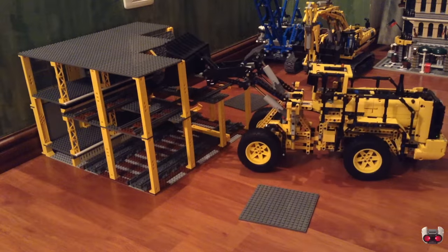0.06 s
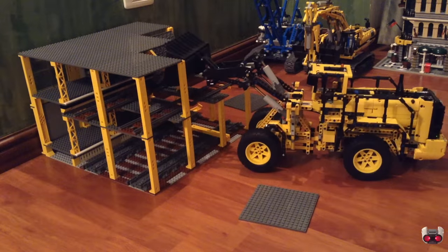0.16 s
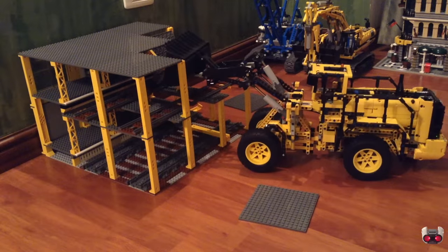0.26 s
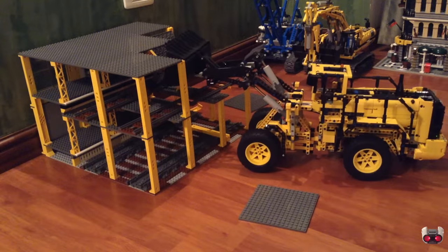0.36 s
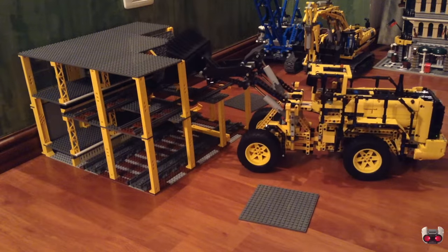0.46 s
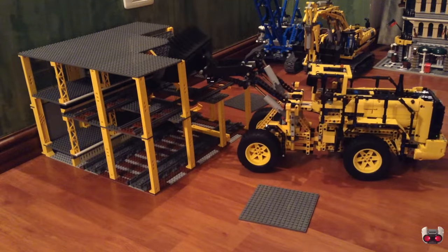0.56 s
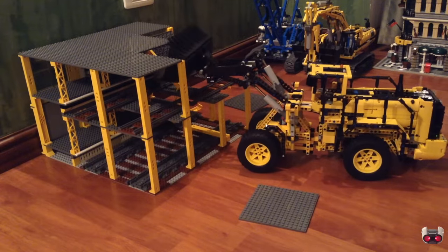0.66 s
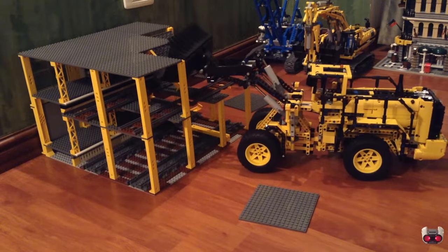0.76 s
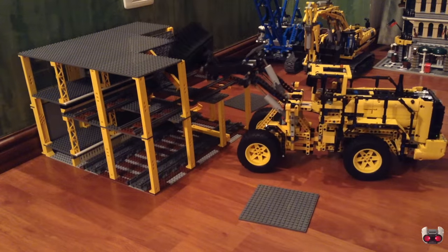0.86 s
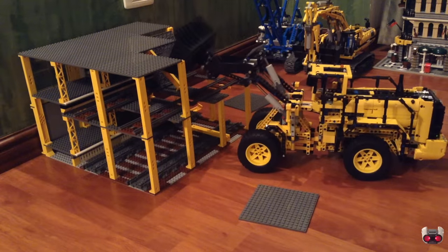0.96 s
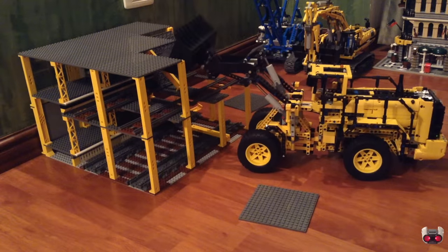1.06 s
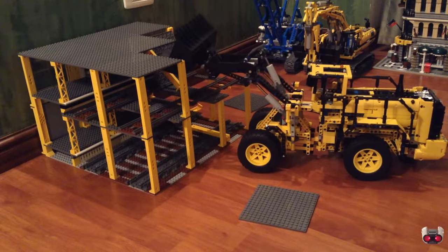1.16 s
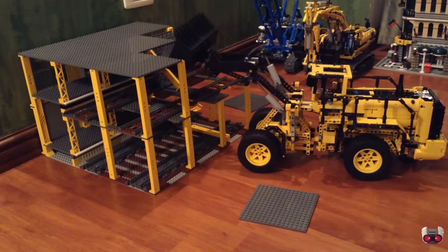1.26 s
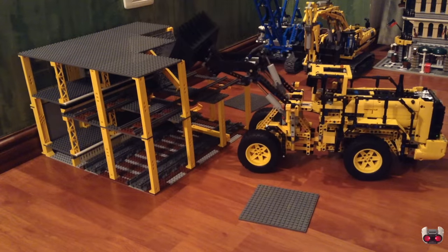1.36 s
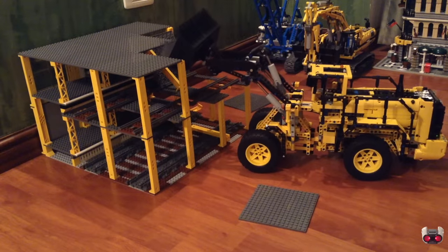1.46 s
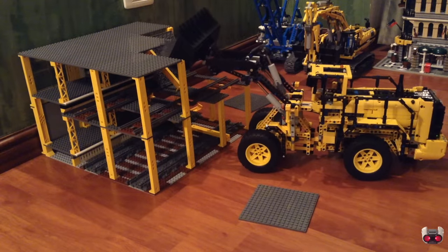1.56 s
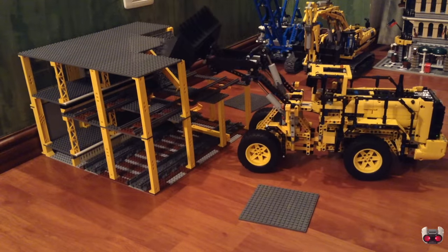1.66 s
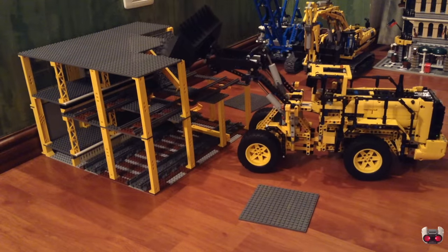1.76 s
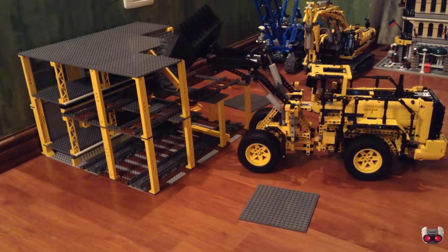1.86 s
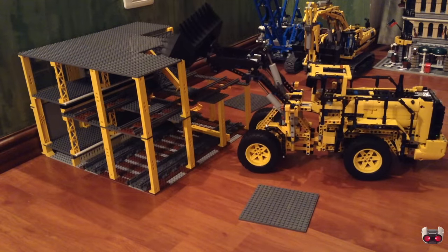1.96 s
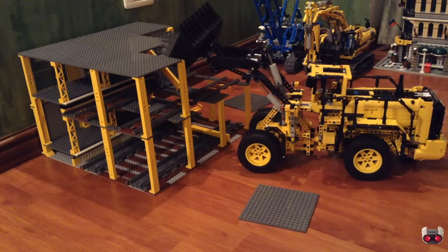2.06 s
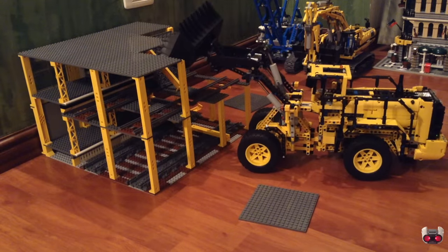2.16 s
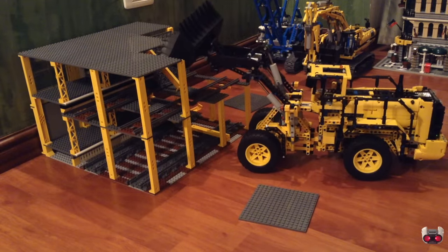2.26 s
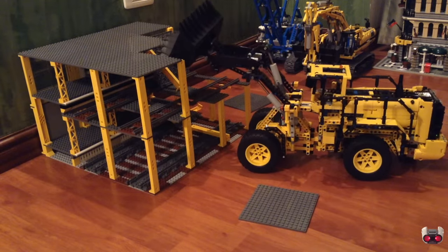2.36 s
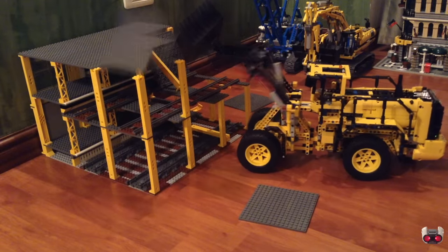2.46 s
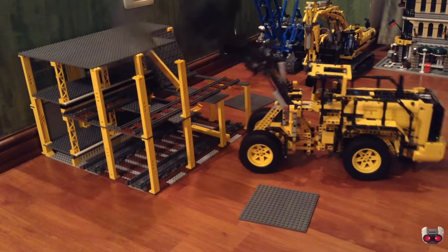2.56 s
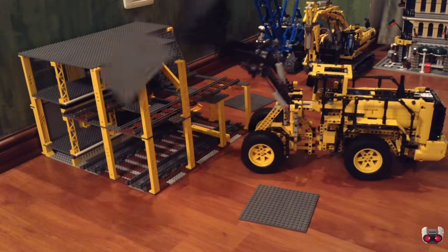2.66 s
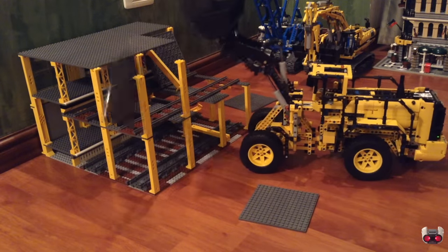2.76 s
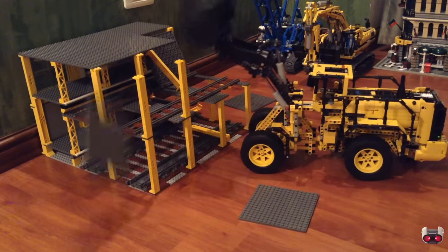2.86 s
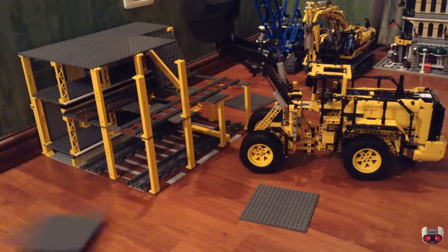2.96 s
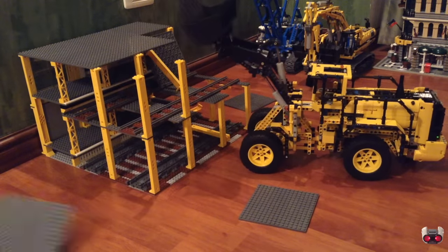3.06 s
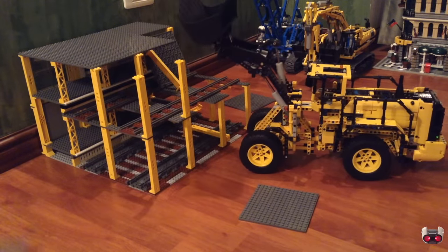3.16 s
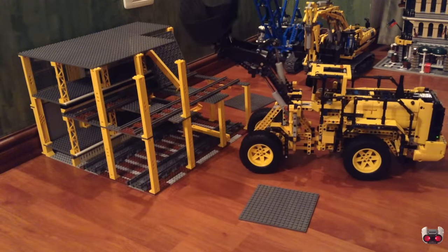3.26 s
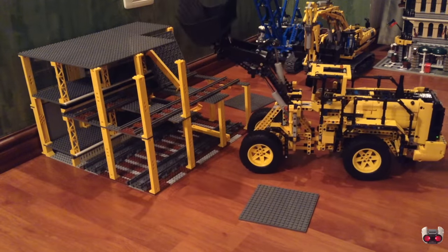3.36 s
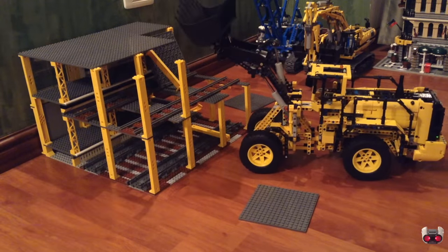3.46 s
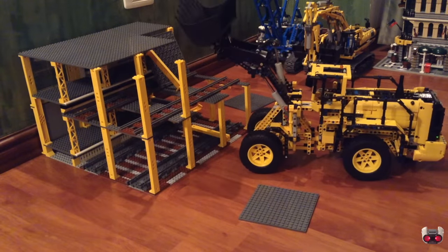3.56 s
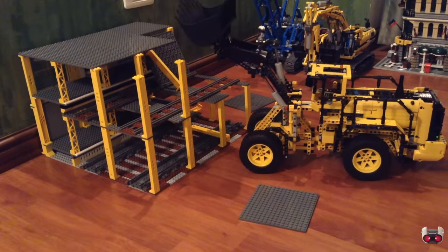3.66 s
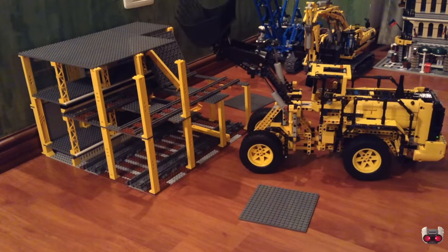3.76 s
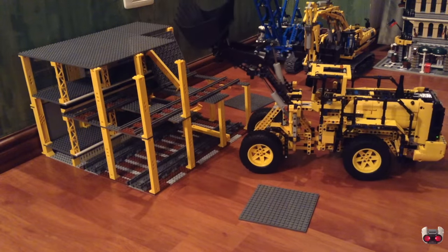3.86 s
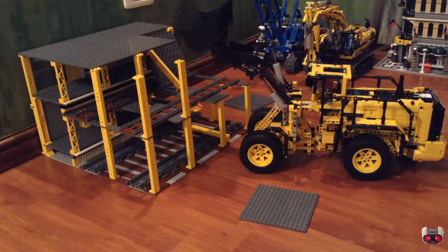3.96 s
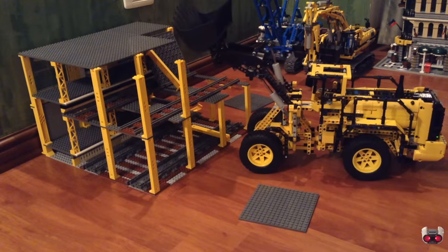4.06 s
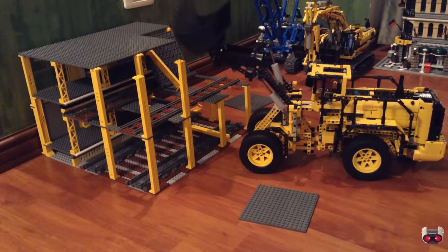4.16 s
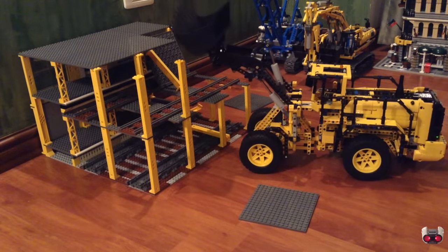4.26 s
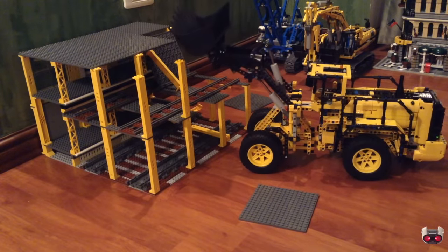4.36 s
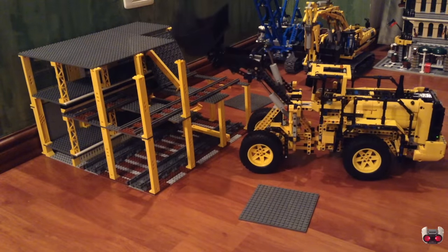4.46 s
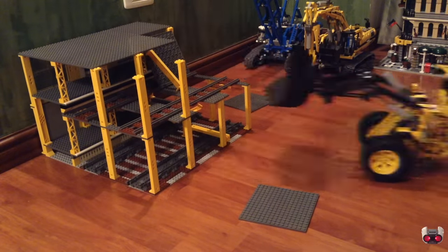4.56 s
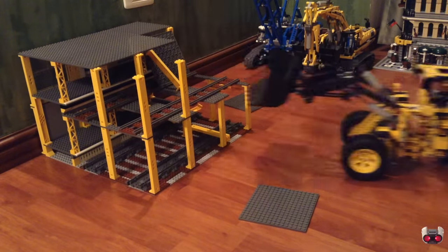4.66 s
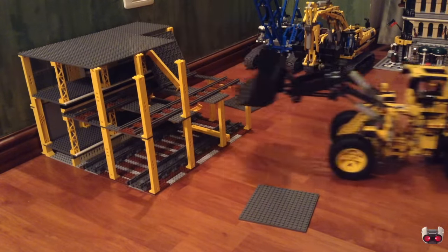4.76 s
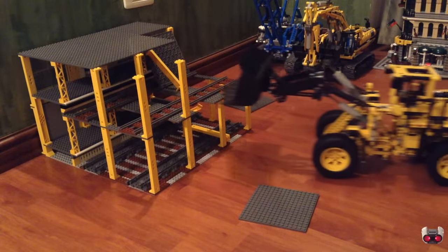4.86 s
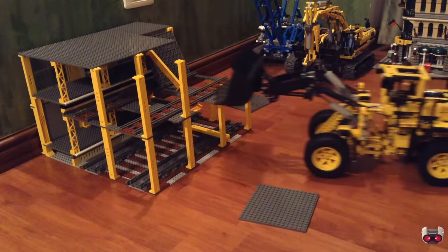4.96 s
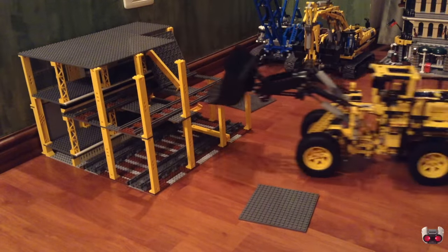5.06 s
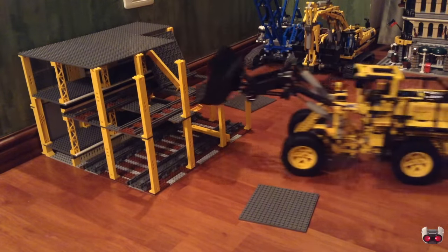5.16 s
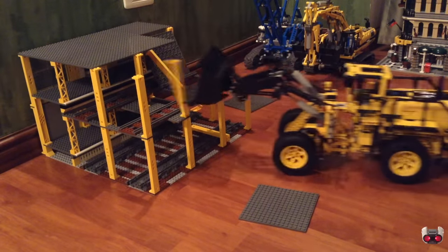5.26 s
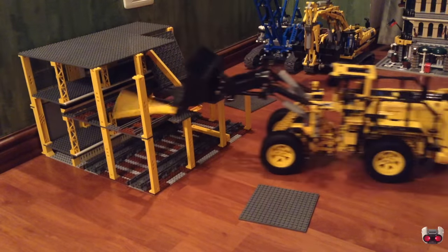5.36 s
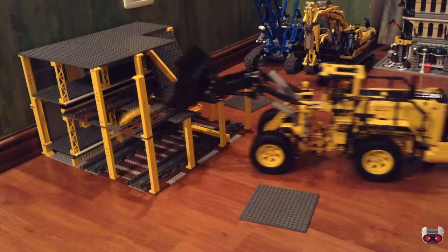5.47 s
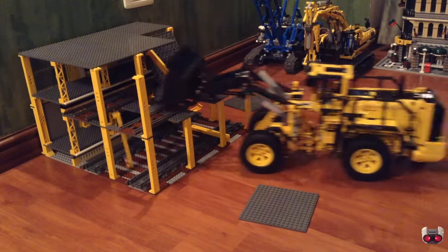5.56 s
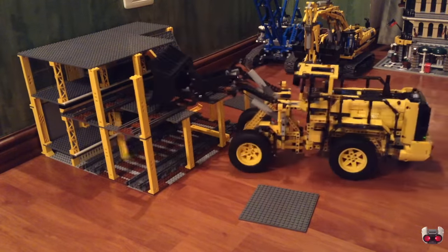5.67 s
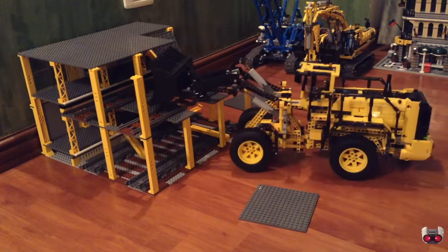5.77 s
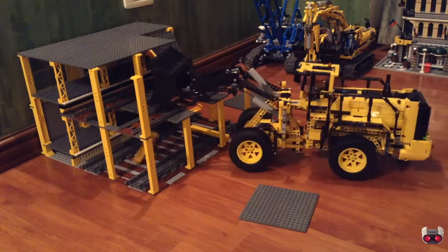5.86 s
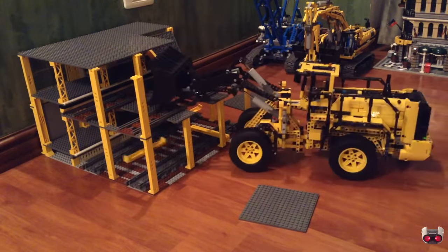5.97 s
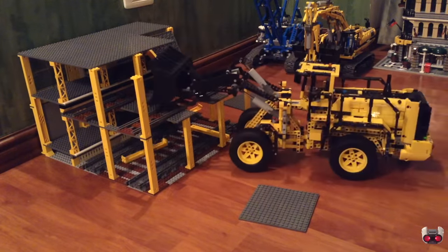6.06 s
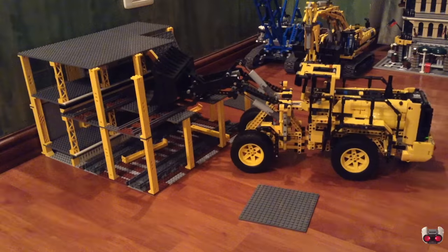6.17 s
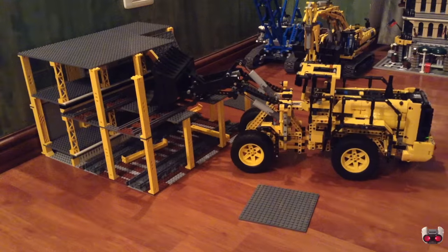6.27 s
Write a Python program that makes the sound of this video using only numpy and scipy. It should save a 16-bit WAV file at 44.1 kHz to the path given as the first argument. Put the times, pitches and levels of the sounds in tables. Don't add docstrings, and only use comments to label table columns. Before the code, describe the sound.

A toy loader's geared motor whirs with small clicks, flings a clattering plate, whirs again, and squeaks forward to crash into loose plastic.

```python
import sys
import numpy as np
from scipy import signal
from scipy.fft import rfft, irfft, next_fast_len
from scipy.io import wavfile
from scipy.ndimage import uniform_filter1d

SR = 44100
rng = np.random.default_rng(int(sys.argv[2]) if len(sys.argv) > 2 else 0)


def volts_from_db(level):
    exponent = np.asarray(level, float) / 20
    return 10 ** exponent


def bounce(signal):
    frames = np.transpose(np.atleast_2d(signal))
    limited = np.clip(frames, -1, 1)
    pcm = np.round(limited * 32767).astype(np.int16)
    wavfile.write(sys.argv[1], SR, pcm)


N = 279153
TIME = np.arange(N) / SR

# t/s, tooth rate f/Hz, level/dB
ARM_LIFTING = [(.133, 1230, -58.5), (.185, 1295, -46), (.24, 1366, -41.5), (.32, 1436, -40.5),
               (1.05, 1454, -39.5), (1.55, 1357, -39), (1.8, 1294, -39.5), (2.02, 1207, -39),
               (2.25, 1118, -40), (2.47, 1030, -39.5)]
# t/s, tooth rate f/Hz, level/dB
ARM_FREED = [
    (2.47, 1330, -36.5),
    (2.772, 1310, -38.5),
    (2.9, 1370, -38),
]
# multiple of tooth rate, level/dB
ARM_ORDERS = [(1, -6), (2, 1), (3, 2), (4, 1), (5, -1), (6, -3), (7, -5)]
# f/Hz, level/dB per Hz
ARM_HISS = [(210, -41.5), (400, -21.5), (822, -14), (904, -16), (1090, -11.5), (1280, -9), (1410, -9.5),
            (1570, -10.5), (2300, -7), (2520, -2), (3100, -5), (5650, 0.5), (10600, -1.5), (13300, -1.5),
            (15300, -1)]


def arm_motor():
    return motor([ARM_LIFTING, ARM_FREED], ARM_ORDERS, ARM_HISS, wobble=0.0065,
                 grit_db=1.14, whine_db=-19.0, hum_db=-21.5, hum_width_hz=26)


# t/s, tooth rate f/Hz, level/dB
BUCKET_TIPPING = [(3.74, 1180, -77), (3.78, 1240, -53.5), (3.84, 1269, -47.5), (4.24, 1283, -47.5),
                  (4.37, 1218, -57.5), (4.41, 1260, -45), (4.62, 1240, -47)]
# multiple of tooth rate, level/dB
BUCKET_ORDERS = [(.47, -8), (2, -8), (4, -4), (5, 1)]
# f/Hz, level/dB per Hz
BUCKET_HISS = [(210, -68), (350, -27), (590, -16), (648, -26.5), (1010, -17), (1300, -20), (1430, -12),
               (1600, -19), (2690, -9), (2910, -9), (3300, -10), (5060, -7.5), (15300, -7)]


def bucket_motor():
    return motor([BUCKET_TIPPING], BUCKET_ORDERS, BUCKET_HISS, wobble=0.01,
                 grit_db=-3.0, whine_db=-20, hum_db=-34.5, hum_width_hz=80)


# t/s, tooth rate f/Hz, level/dB
WHEELS_DRIVING = [(4.6, 1332, -64), (4.62, 1310, -37.5), (5.0, 1340, -37), (5.13, 1287, -35),
                  (5.27, 1225, -36), (5.45, 1200, -34.5), (5.8, 1180, -38.5), (5.83, 1157, -70)]
# multiple of tooth rate, level/dB
WHEEL_ORDERS = [(1, -5), (2, -4), (3, -5), (4, -2), (5, -6), (7, 0)]
# f/Hz, level/dB per Hz
WHEEL_HISS = [(160, -31.5), (280, -16), (447, -9), (556, -10), (636, -6), (889, -18), (1370, -16.5),
              (2020, -18), (2500, -9.5), (2970, -18), (4010, -14.5), (4430, -17), (8500, -6), (9400, -2),
              (10600, -6), (13200, -4), (15300, -16)]


def wheel_motor():
    return motor([WHEELS_DRIVING], WHEEL_ORDERS, WHEEL_HISS, wobble=0.008,
                 grit_db=1.44, whine_db=-20.5, hum_db=-27.5, hum_width_hz=110)


# f/Hz, level/dB
HOUSING = [(1000, -4), (2200, 0), (2550, 5), (2850, -1), (3300, -2), (3700, 3), (3850, -1), (4000, 5),
           (4090, 4), (4170, 2), (4300, 1), (4900, 2), (5200, 7), (5400, 5), (5600, 7), (5800, 6),
           (6150, 0), (6550, 7), (6800, 4), (7200, 2), (7700, 1), (9000, 5)]
# t/s, share of speed lost, build-up/s, release/s
JAMS = [
    (.27, 0.04, .27, .03),
    (.54, .045, .34, .04),
]
HUM_HZ = (410, 361)


def motor(curves, orders, hiss, wobble, grit_db, whine_db, hum_db, hum_width_hz):
    gate, tooth_hz, effort_db = motor_curves(curves)
    loaded = TIME < curves[0][-1][0]
    speed = 1 - shower(JAMS) + wobble * walk(60)
    phase = 2 * np.pi * np.cumsum(tooth_hz * speed) / SR

    whine = np.zeros(N)
    for order, order_db in orders:
        housing_db = np.interp(order * tooth_hz, *np.transpose(HOUSING))
        patchy_db = 2.8 * (0.62 * walk(14) + 0.76 * walk(45))
        whine += volts_from_db(order_db + housing_db + patchy_db) * np.sin(order * phase)

    shaft = np.sin(phase / 2.86) * volts_from_db(walk(7))
    hum = sum(band(band(shaft, hz, hum_width_hz), hz, hum_width_hz) for hz in HUM_HZ)

    grit = volts_from_db(grit_db * rng.exponential(size=N) + 0.86 * walk(120))
    brushes = rng.standard_normal(N) * grit * (1 + 0.077 * np.cos(phase / 6))
    geared = volts_from_db(whine_db) * whine + volts_from_db(hum_db) * hum
    return gate * volts_from_db(effort_db) * (unit(colour(brushes, hiss)) + loaded * geared)


def motor_curves(curves):
    gate = np.zeros(N)
    for curve in curves:
        gate += np.clip(np.minimum(TIME - curve[0][0], curve[-1][0] - TIME) / 0.0046, 0, 1)
    for curve in curves[1:]:
        gate += np.abs(TIME - curve[0][0]) < .006
    s, tooth_hz, effort_db = np.transpose(np.concatenate(curves))
    return np.minimum(gate, 1), np.interp(TIME, s, tooth_hz), np.interp(TIME, s, effort_db)


# t/s, level/dB, f/Hz, a third of the fade time/s
SQUEAKS = [(4.612, -49, 4640, 0.017), (4.61, -47, 2800, 0.0064), (4.64, -43, 2770, 0.016),
           (4.825, -40.5, 2780, 0.015), (4.985, -40.5, 2810, 0.013), (5.15, -40.5, 2770, 0.012),
           (5.17, -50, 2490, 0.03), (5.326, -45, 2770, 0.0084)]


def squeaks():
    out = np.zeros(N)
    t = np.arange(SR // 4) / SR
    for s, db, hz, rise in SQUEAKS:
        phase = 2 * np.pi * hz * t * (1 - .33 * t)
        pair = np.sin(phase) + 0.35 * np.sin(.955 * phase)
        swell = np.minimum(t / 0.0046, 1) * np.exp(-(t / (3 * rise)) ** 2)
        start = int(s * SR)
        out[start:start + len(t)] += volts_from_db(db) * swell * pair
    return out * volts_from_db(4.5 * walk(140))


# t/s, crack peak level/dB, thud level/dB re crack, crack f/Hz, crack length/s
SNAGS = [(0.0, -35, -14.5, 1600, 0.023), (0.001, -40.5, -27, 4800, 0.045), (0.524, -42, 0, 2000, 0.015),
         (0.538, -37, -20, 3300, .008), (0.546, -33, -12, 2400, 0.012), (.56, -37, -12, 1400, .015),
         (0.878, -41, 2, 3000, 0.01), (.886, -37, -20, 3500, .015), (0.9, -36, -20, 1900, 0.012),
         (1.285, -39, -11, 5560, .0094), (1.299, -30, -14, 3000, 0.012), (1.308, -31, -14, 1500, .015),
         (1.358, -37, -6, 5560, 0.018), (1.478, -37.5, -2.5, 3000, 0.013), (1.64, -33, -13, 3500, 0.023),
         (2.474, -28.5, -9, 2350, 0.029), (2.483, -30.5, -4.5, 3000, .01), (2.49, -24.5, -5, 2600, 0.019),
         (2.494, -23, -30, 10500, .004), (2.507, -25.5, -12, 9000, 0.007), (2.514, -27, -15, 7000, .005),
         (2.572, -27, -16, 7000, 0.008), (2.62, -32, -20, 7000, .006), (4.614, -38, -35, 2760, 0.024),
         (5.266, -30, -6.5, 2620, 0.046)]
# f/Hz, level/dB, t60/s
ARM_MODES = [(272, -9, 0.26), (358, -6.5, 0.24), (409, 3.5, 0.069), (488, -2, 0.05), (580, 14, 0.02),
             (643, 5, 0.03), (784, 0.5, 0.049), (1016, 5, 0.11), (1110, -10, 0.043), (1682, -2.5, 0.11)]


def arm_snags():
    return blows(SNAGS, ARM_MODES, ring_db=-7.5, ring_s=0.012, ring_top_hz=2270, scrape=1.55,
                 snap=0, wide_db=-25, rise_s=0.0017, spread=1.0)


# t/s, crack peak level/dB, thud level/dB re crack, crack f/Hz, crack length/s
FALL = [(2.724, -8, -14, 3100, 0.008), (2.761, -17, -11, 2340, 0.022), (2.791, -20, -30, 13500, .004),
        (2.803, -13, -20, 9000, 0.008), (2.832, -10, -24.5, 8900, 0.006), (2.845, -21, -27, 11000, .012),
        (2.876, -15, -28, 8100, 0.0043), (2.901, -13, -26, 10500, 0.015), (2.92, -17.5, -18, 3000, 0.018),
        (2.935, -13.5, -18, 9830, 0.005), (2.941, -12, -27, 9500, 0.0078), (2.972, -18, -38, 9700, .004),
        (2.978, -11, -43, 9000, 0.005), (2.987, -15, -28, 3940, 0.011), (3.013, -10.5, -38, 9200, 0.0095),
        (3.02, -12, -44, 10500, 0.011), (3.034, -11, -49, 9900, 0.0058), (3.038, -12, -43, 6530, 0.009),
        (3.117, -23.5, -17.5, 8800, 0.006), (3.123, -24, -25, 9600, 0.011), (3.2, -24.5, -21, 8300, 0.0081),
        (3.231, -32, -11, 8520, 0.012), (3.272, -20, -21, 8900, 0.024), (3.28, -16.5, -32, 2400, 0.0075),
        (3.318, -25.5, -12.5, 9900, 0.0062), (3.35, -20.5, -22.5, 8100, 0.005),
        (3.428, -30, -30, 7000, 0.006), (3.433, -28, -26, 9500, .005), (3.449, -26, -13, 1500, 0.005),
        (3.45, -23, -43, 7400, 0.011), (3.457, -26, -30, 6500, .004)]
# f/Hz, level/dB, t60/s
PLATE_MODES = [(251, -10, 0.092), (315, -41, 0.055), (408.3, -2, 0.28), (452, -1, 0.13), (527, -4, 0.13),
               (576, -1, 0.044), (642, -14, 0.074), (698, 3.5, 0.055), (802, -0.5, 0.12), (962, 0, 0.12),
               (1087, 0.5, 0.092), (1240, -23, 0.12), (1550, -31, .08), (1865, -4, 0.077)]


def plate_fall():
    return blows(FALL, PLATE_MODES, ring_db=-16.0, ring_s=0.013, ring_top_hz=3000, scrape=0.72,
                 snap=0.9, wide_db=-5, rise_s=0.0007, spread=1.26)


# t/s, crack peak level/dB, thud level/dB re crack, crack f/Hz
RAM = [(5.439, -28, -37, 8570), (5.464, -20, -13.5, 3000), (5.468, -22.5, -11.5, 2800),
       (5.482, -22.5, -20, 3180), (5.504, -31.5, -6.5, 2750), (5.563, -24, -24, 6000),
       (5.566, -11, -19, 6400), (5.632, -13, -17, 2600), (5.699, -28, -6, 2760), (5.747, -21, -16, 2400),
       (5.759, -20.5, -11.5, 2500), (5.787, -23, -12.5, 5600), (5.794, -23, -22, 4400),
       (5.823, -28, -20, 3500), (5.856, -21.5, -18.5, 2900), (5.875, -26, -22, 7000),
       (5.878, -29, -27, 6500), (5.922, -23, -19, 5450), (5.958, -23, -16, 4000), (5.989, -17.5, -18, 4370),
       (6.004, -19, -21, 4670), (6.01, -19, -21, 3970), (6.049, -25, -17, 4500), (6.104, -26, -22.5, 4470),
       (6.124, -27, -28, 2960), (6.268, -46, -30, 9800), (6.284, -46.5, -44, 9550)]
# f/Hz, level/dB, t60/s
FRAME_MODES = [(228, -35, .1), (312, -36, 0.071), (375.6, 0.5, 0.22), (480, -13, 0.074), (567, 8, 0.062),
               (627, 6, 0.075), (698, 6.5, 0.035), (920, -6, 0.098), (1030, -29, 0.07), (1230, -3.5, 0.12),
               (1616, 6.5, 0.076), (1880, -8, 0.14)]


def frame_ram():
    crack_s = 0.0071
    return blows([event + (crack_s,) for event in RAM], FRAME_MODES, ring_db=-8.0, ring_s=0.0066,
                 ring_top_hz=6600, scrape=2.9, snap=1.0, wide_db=-15.5, rise_s=0.00054, spread=1.3)


def blows(events, modes, ring_db, ring_s, ring_top_hz, scrape, snap, wide_db, rise_s, spread):
    out = np.zeros(N + SR)
    t = np.arange(SR // 6) / SR
    hz, mode_db, t60 = np.array(modes).T[:, :, None]
    for s, db, thud_db, crack_hz, length in events:
        noise = rng.standard_normal((3, len(t)))
        level_chance, pitch_chance = rng.standard_normal((2, len(modes), 1))

        decay = np.exp(-t / length) + snap * np.exp(-t / .002)
        burst = noise[0] * decay * np.minimum(t / max(.07 * length, rise_s), 1)
        crack = band(band(burst, crack_hz, spread * crack_hz), crack_hz, 2 * crack_hz)
        crack = crack + volts_from_db(wide_db) * burst

        ring_hz = min(0.83 * crack_hz, ring_top_hz)
        ring = band(noise[1] * np.exp(-t / ring_s), ring_hz, ring_hz / 3)

        mode_level = volts_from_db(mode_db + 2 * level_chance - 60 * t / t60)
        body = mode_level * np.sin(2 * np.pi * hz * (1 + 0.025 * pitch_chance) * t)
        contact = noise[2] * np.exp(-t / (scrape * length))
        thud = signal.fftconvolve(body.sum(axis=0), contact)[:len(t)]

        hit = peak(crack) + volts_from_db(ring_db) * peak(ring) + volts_from_db(thud_db + 3.0) * peak(thud)
        start = int(s * SR)
        out[start:start + len(t)] += volts_from_db(db) * hit
    return signal.sosfilt(signal.butter(4, 190, "high", fs=SR, output="sos"), out[:N])


# t/s, level/dB, f/Hz, decay/s
RINGS = [(2.726, -20.5, 576, 0.0072), (2.726, -22.5, 1920, 0.022), (2.775, -22.5, 415, 0.024),
         (2.988, -27.5, 433, 0.013), (3.124, -44, 960, 0.031), (3.279, -30, 1580, 0.008),
         (3.301, -57, 960, 0.11), (2.727, -24.5, 976, 0.016), (2.725, -41, 1100, 0.013),
         (2.727, -22.5, 700, 0.0074), (2.728, -25.5, 601, 0.036), (2.74, -28.5, 452, 0.036),
         (2.876, -19, 8000, 0.0026), (3.45, -31.5, 1240, 0.0058), (3.285, -36, 434, .02),
         (3.36, -50, 1550, .02), (5.856, -27, 3000, .004), (5.464, -25, 2750, .004), (3.33, -45, 960, .03),
         (.885, -46.5, 436, 0.034), (5.268, -33, 900, 0.03), (5.27, -34, 1080, .03),
         (5.467, -24.5, 2980, 0.008), (5.565, -16, 5850, 0.0029), (5.575, -32, 6510, .008),
         (5.634, -22, 1710, 0.019), (5.747, -26, 2170, 0.004), (5.758, -19.5, 2300, 0.0034),
         (5.787, -26, 1730, 0.019), (5.7, -31.5, 1760, .015), (5.505, -30, 2750, 0.013),
         (5.922, -25.5, 2450, 0.0054), (2.76, -32.5, 650, 0.024), (2.727, -27.5, 1850, .025),
         (5.634, -29, 389, 0.023), (6.065, -29.5, 2850, 0.018), (3.037, -23, 6450, 0.0052),
         (3.283, -33.5, 2200, 0.019), (3.457, -30.5, 1970, 0.0071), (3.352, -41, 3400, 0.014),
         (2.728, -24.5, 3400, .012), (5.875, -33.5, 360, 0.016), (5.951, -37, 378, 0.055),
         (5.99, -32, 7650, 0.0096), (5.992, -30, 4830, 0.011), (6.059, -46, 373, 0.033),
         (6.8, -40, 4700, 0.011)]


def rings():
    out = np.zeros(N + SR)
    t = np.arange(SR // 5) / SR
    for s, db, hz, decay in RINGS:
        width_hz = max(hz / 7, 1 / decay)
        scrape = rng.standard_normal(len(t)) * np.exp(-t / decay)
        ring = band(band(scrape, hz, width_hz), hz, 3 * width_hz)
        start = int(s * SR)
        out[start:start + len(t)] += volts_from_db(db) * peak(ring)
    return out[:N]


# t/s, bright level/dB, dull level/dB re bright, rise/s, decay/s
PLATE_RATTLE = [
    (0.0, -67, 23, 0.0016, 0.04),
    (2.722, -40.5, 13, 0.0021, 0.07),
    (2.86, -39, -16, 0.072, 0.033),
    (2.985, -29.5, 6.5, 0.0016, 0.025),
    (3.27, -43, -2, 0.022, 0.036),
    (3.45, -43, 2, 0.0036, 0.03),
]
# f/Hz, level/dB per Hz
PLATE_TONE = [(530, -31), (900, -6.5), (1430, 10), (1560, 15), (2360, -5), (2720, 3), (3030, 7.5),
              (13800, -20), (15500, -6)]
# t/s, bright level/dB, dull level/dB re bright, rise/s, decay/s
FRAME_RATTLE = [
    (5.265, -50.5, 8, 0.011, 0.4),
    (5.464, -29.5, 3, 0.0036, 0.017),
    (5.565, -36.5, 8, 0.0028, 0.037),
    (5.67, -33.5, 3, 0.079, 0.12),
    (5.985, -28, -21, 0.02, 0.065),
]
# f/Hz, level/dB per Hz
FRAME_TONE = [(530, -42), (900, -17), (1710, 3), (2890, -2), (3140, -10), (4940, -2), (8050, -7.5),
              (11200, -10), (13400, -15), (15500, -31)]


def rattle(events, tone):
    ticks = (rng.random(N) < 1500 / SR) * volts_from_db(2.5 * rng.exponential(size=N))
    smear = signal.lfilter([1], [1, -np.exp(-1 / (0.0011 * SR))], ticks)
    bright = unit(colour(smear * rng.standard_normal(N), tone))
    shake = np.sqrt(smear) * rng.standard_normal(N)
    dull = np.zeros(N)
    for hz, width_hz, db in [(270, 37, -9), (415, 115, 7), (619, 350, -7.0), (950, 1100, 5.5)]:
        dull += volts_from_db(db) * band(band(shake, hz, width_hz), hz, 2 * width_hz)
    bright_level = shower([(s, volts_from_db(db - 6.5), rise, decay) for s, db, _, rise, decay in events])
    dull_level = shower([(s, volts_from_db(db + dull_db - 8.5), rise, decay) for s, db, dull_db, rise, decay in events])
    return bright_level * bright + dull_level * unit(dull)


# f/Hz, t60/s
ROOM_T60 = [(650, 0.49), (1400, 0.54), (4000, 0.5), (12000, 0.28)]


def room(near, send):
    t = np.arange(int(SR * .6)) / SR
    hz, t60 = np.transpose(ROOM_T60)
    noise = rng.standard_normal(len(t))
    tail = np.zeros(len(t))
    for f in 150 * 2 ** np.arange(0, 7, .5):
        tail += band(noise, f, f / 2) * volts_from_db(-60 * t / np.interp(np.log(f), np.log(hz), t60))
    tail = tail * np.clip((t - .002) / 0.012, 0, 1)
    return near + signal.fftconvolve(send, tail / np.sqrt(np.sum(tail ** 2)))[:N]


# f/Hz, level/dB per Hz
RUMBLE_TONE = [(15, -59), (25, -37), (54, -21), (69, -24), (97, -4), (134, -11.5), (162, 3.5), (177, 4),
               (204, -14), (259, 4.5), (302, -11), (322, -16.5), (340, -20.5), (440, -44), (750, -120)]


def boards():
    thuds = [(event[0], volts_from_db(event[1] + event[2] - 39.5), .02, 0.1) for event in SNAGS + FALL + RAM]
    steady = volts_from_db(np.where(TIME < 2.5, -66, -72))
    level = np.hypot(steady, shower(thuds)) * volts_from_db(0.5 * walk(18.0))
    return level * unit(colour(rng.standard_normal(N), RUMBLE_TONE))


# f/Hz, level/dB per Hz
HUSH_TONE = [(200, -48), (340, 0), (412, -35), (613, -42), (843, -20), (1120, 2), (1520, -11), (1700, -1),
             (5260, -11), (15300, -42)]


def room_hush():
    return volts_from_db(-70.5 + 0.45 * walk(4.3)) * unit(colour(rng.standard_normal(N), HUSH_TONE))


def unit(x):
    return x / np.sqrt(np.mean(x ** 2))


def peak(x):
    return x / np.abs(x).max()


def colour(x, tone):
    hz, db = np.transpose(tone)
    size = next_fast_len(len(x))
    bins = np.log(np.arange(size // 2 + 1) * SR / size + 1)
    gain = volts_from_db(np.interp(bins, np.log(hz), db))
    return irfft(rfft(x, size) * gain, size)[:len(x)]


def walk(rate):
    knots = rng.standard_normal(int(N / SR * rate) + 2)
    steps = np.repeat(knots, 8)
    smooth = uniform_filter1d(uniform_filter1d(steps, size=8), size=8)
    return np.interp(TIME, np.arange(len(smooth)) / (8 * rate), unit(smooth))


def band(x, hz, width_hz):
    return signal.lfilter(*signal.iirpeak(hz, hz / min(width_hz, SR / 3), SR), x)


def shower(events):
    out = np.zeros(N)
    for s, gain, rise, decay in events:
        start = int(s * SR) + 1
        t = np.maximum(TIME[start:] - s, 0)
        out[start:] += gain * np.minimum(t / rise, 1) ** 2 * np.exp(-np.maximum(t - rise, 0) / decay)
    return out


def scene():
    motors = arm_motor() + bucket_motor() + wheel_motor() + squeaks()
    clatter = arm_snags() + plate_fall() + frame_ram() + rings()
    clatter = clatter + rattle(PLATE_RATTLE, PLATE_TONE) + rattle(FRAME_RATTLE, FRAME_TONE)
    send = volts_from_db(-8.5) * motors + volts_from_db(-7.0) * clatter
    mono = room(motors + clatter, send) + room_hush() + boards()
    return np.array([mono, mono])


def roll_off(x):
    return signal.sosfilt(signal.butter(12, 16470, fs=SR, output="sos"), x)


def record(dry):
    mix = signal.sosfilt(signal.cheby2(16, 60, 15600, fs=SR, output="sos"), dry)
    return roll_off(mix)


dry = scene()
out = record(dry)
bounce(out)
```